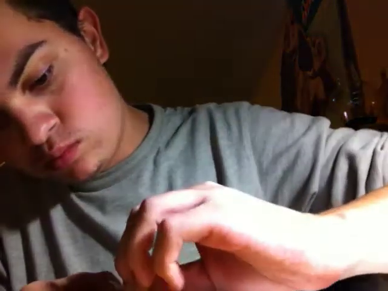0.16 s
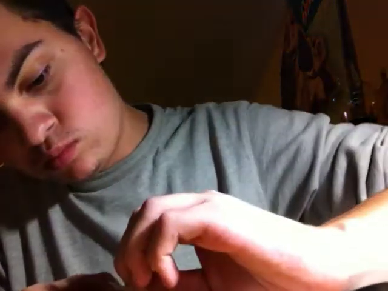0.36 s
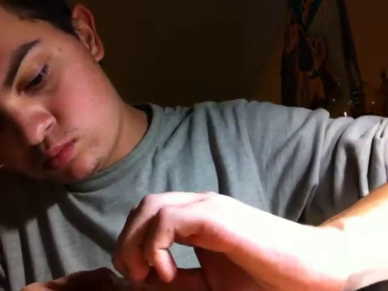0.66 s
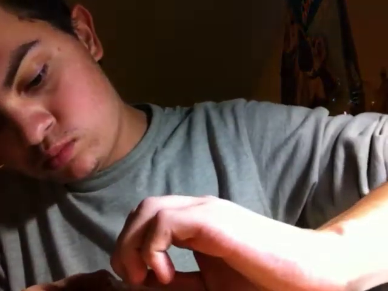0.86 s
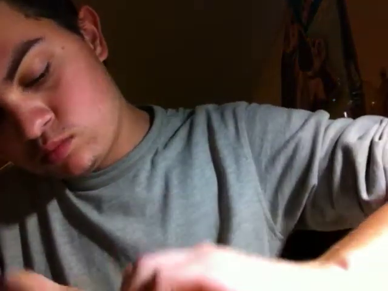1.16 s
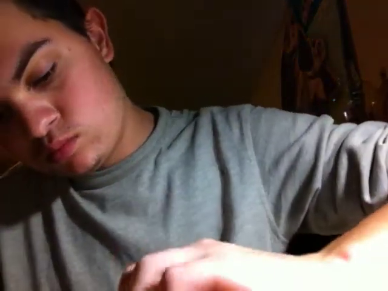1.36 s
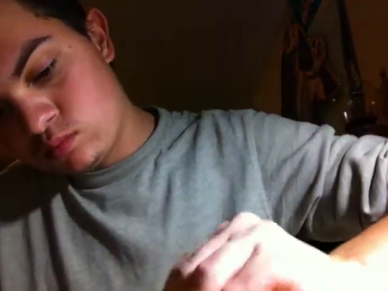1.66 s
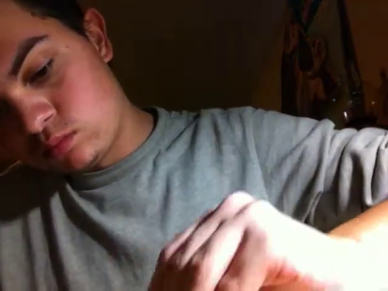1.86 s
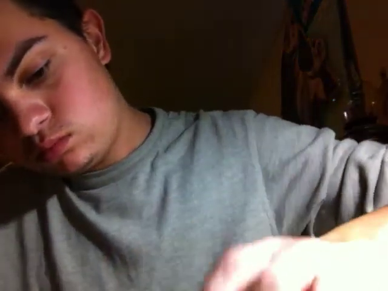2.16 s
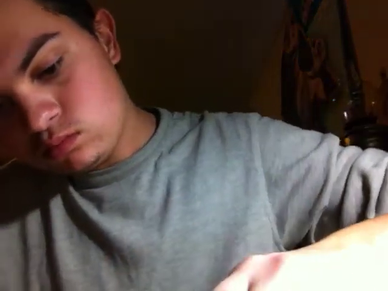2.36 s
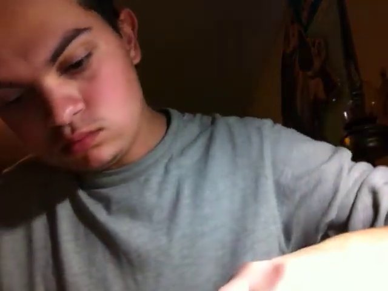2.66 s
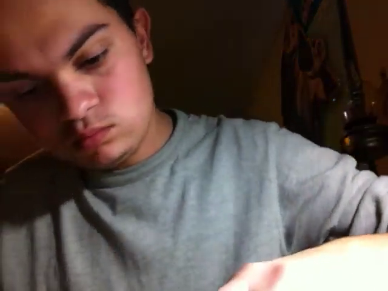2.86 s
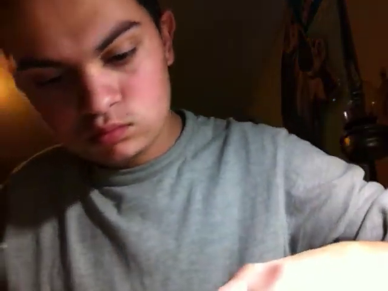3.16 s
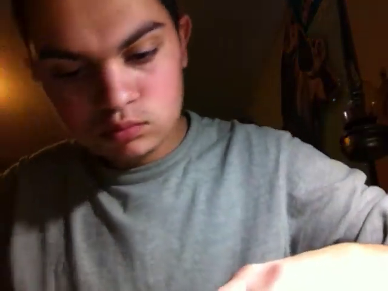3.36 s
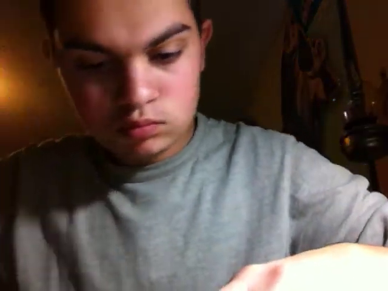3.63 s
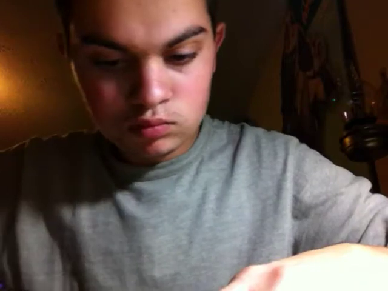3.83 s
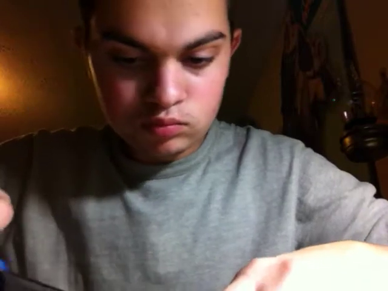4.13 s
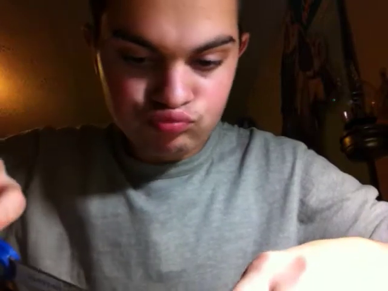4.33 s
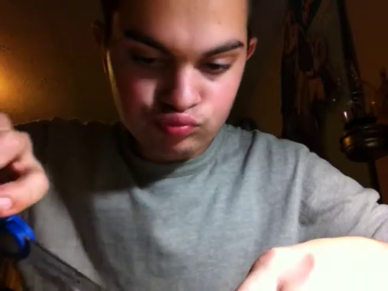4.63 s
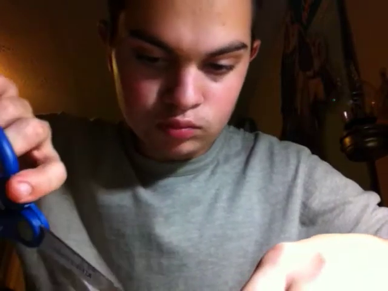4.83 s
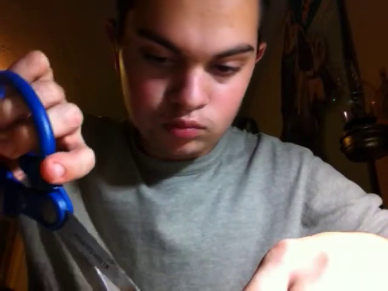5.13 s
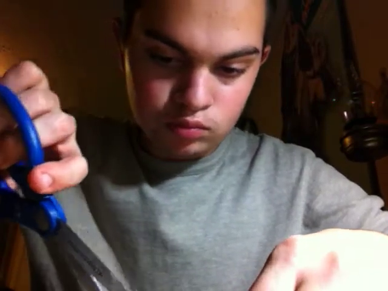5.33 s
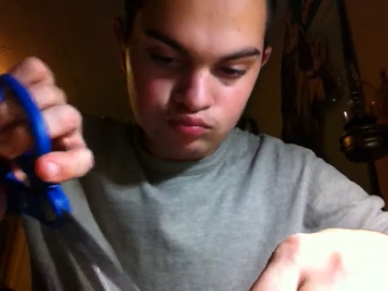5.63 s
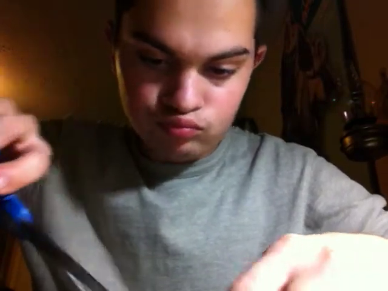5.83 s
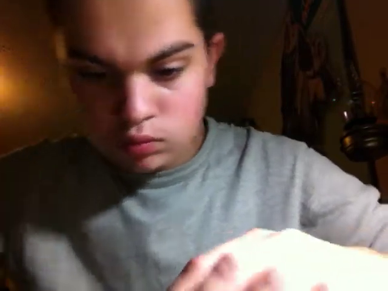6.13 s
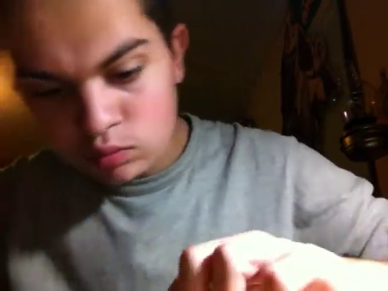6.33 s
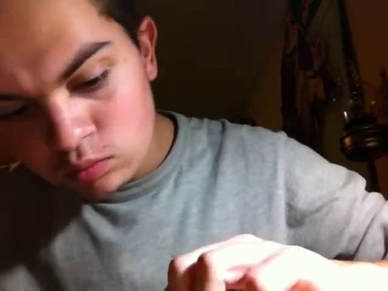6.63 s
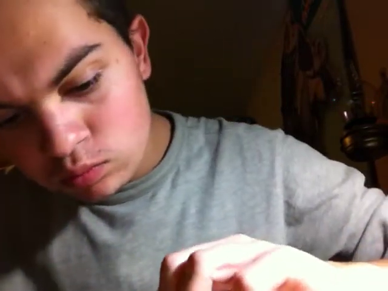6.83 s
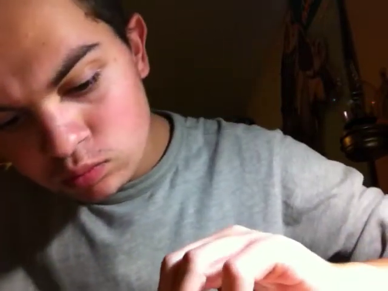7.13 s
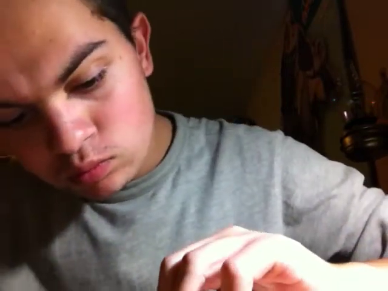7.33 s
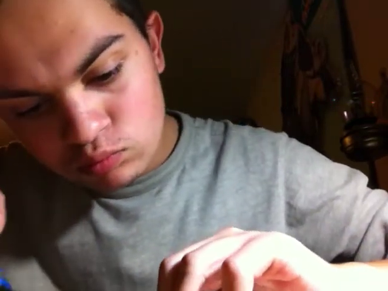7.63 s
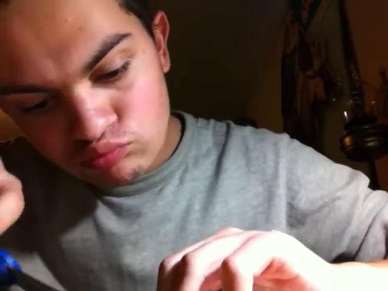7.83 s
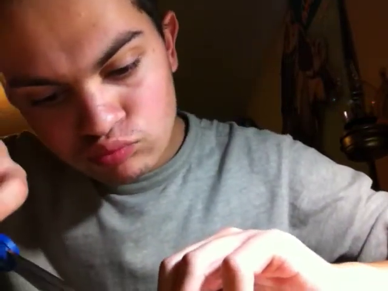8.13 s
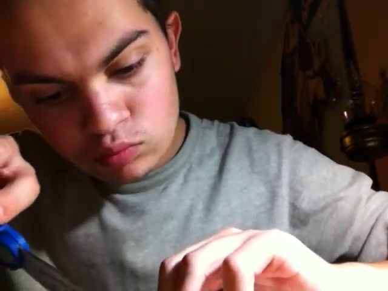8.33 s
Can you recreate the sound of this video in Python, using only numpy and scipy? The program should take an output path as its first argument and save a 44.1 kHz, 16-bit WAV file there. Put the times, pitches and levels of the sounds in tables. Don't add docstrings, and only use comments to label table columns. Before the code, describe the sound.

For the first second there is only a low, slightly wavering motor hum and soft microphone hiss in a small quiet room. From about 1.0 s plastic rustles; at 1.2 a hollow wooden knock lands with a short scrape and a few softer bumps. A sharp scissor snap cracks at 1.6, and the loudest, brightest snap at 1.73, with scraping and crinkling until about 2.1. Dull rubs follow from 2.25, then a rapid stick-slip creak around 2.5-2.6 and a resonant third snap at 2.74. From 2.9 to 5.6 it is mostly hum, with lone faint ticks near 3.45, 4.15, 4.4, 4.85 and 5.3. A weaker cut comes at 5.68 amid small clicks, then a soft rub at 6.07 and scattered snips. A last moderate cut snaps at 7.5, followed by faint ticks at 7.6-8.35 as the hiss sinks slightly.

```python
import sys
import numpy as np
from scipy import signal
from scipy.fft import rfft, irfft
from scipy.io import wavfile
from scipy.ndimage import uniform_filter1d

SR = 44100
rng = np.random.default_rng(int(sys.argv[2]) if len(sys.argv) > 2 else 0)


def volts_from_decibels(level):
    exponent = np.asarray(level, float) / 20
    return 10 ** exponent


def transcribe(signal):
    frames = np.atleast_2d(signal).T
    limited = np.clip(frames, -1, 1)
    pcm = np.round(limited * 32767).astype(np.int16)
    wavfile.write(sys.argv[1], SR, pcm)


N = 374409
PIECE = 4096
BINS_HZ = np.maximum(np.fft.rfftfreq(PIECE, 1 / SR), 100)

# start in seconds, peak in dB, bass limit in Hz, push into the table in dB,
# slope of the valleys in dB per octave.
CUTS = [
    (1.605, -11.5, 484, -21.5, -10),
    (1.73, -4, 850, -31, -4.5),
    (2.738, -15.5, 403, -16.5, -4.5),
    (5.679, -24.5, 600, -25, -1),
    (7.506, -20, 600, -29, -1),
]
# frequency in Hz, width in Hz, level in dB.
CUT_RESONANCES = [
    [(1100, 96, -8), (1720, 97, -2), (3280, 380, -14), (5140, 110, -23), (6240, 105, -33), (6850, 47, -33),
     (8530, 310, -32)],
    [(1720, 130, -1.5), (2970, 420, -5), (5220, 120, -4), (5650, 140, -21), (7160, 220, -12.5),
     (9640, 140, -15), (10200, 150, -20)],
    [(1100, 110, 9.5), (1870, 62, 8.5), (2970, 120, 6), (4100, 280, -2.5), (6360, 100, -25),
     (7660, 160, -18), (12000, 100, -33)],
    [(1100, 110, 3), (3150, 95, -4), (3740, 150, 3), (5050, 280, 6), (6240, 150, -4), (7850, 130, 0),
     (11700, 92, -19)],
    [(1700, 570, 3), (2840, 310, 3), (3600, 290, 5), (5360, 310, 1.5), (7120, 190, -10), (8720, 380, -8.5),
     (11600, 880, -16)],
]
CUT_HOLD_MS, CUT_RELEASE_MS = 2.2, 2.56
CUT_VALLEY_DB, CUT_WIDEN, CUT_TOP_HZ = -4.5, 2.34, 10300

# start in seconds, peak in dB, brightness in dB per octave,
# push into the table in dB.
SNIPS = [(1.331, -40, 1, 6), (1.537, -30.5, 16, -19), (1.866, -37.5, -5.5, -8), (1.881, -29, -10, -27),
         (2.232, -49.5, 5, 5), (2.492, -51, -6, 1), (2.878, -43, -7, -9), (2.889, -50, 3, 2),
         (3.45, -37, 15.5, -20), (4.157, -43.5, 10, -5), (4.391, -41.5, 0, -6), (4.85, -40, -0.5, -13),
         (5.312, -43, -1, -11), (5.639, -45, 2, -9), (5.739, -43, 3, -7), (5.759, -46, 1.5, -9),
         (6.138, -43, -3, -25), (6.353, -39, -6, -8), (6.698, -37.5, 0.3, -20), (6.926, -38, 0, -15),
         (6.966, -43.5, -3, -26), (7.61, -41.5, 0.5, -11), (7.757, -51.5, 1.2, 0), (7.88, -44, 2, -18),
         (7.943, -37.5, 0.5, -14), (8.225, -49, 0, 0), (8.336, -42.5, 4, -3.5)]
SNIP_MS, SNIP_NARROW_DB = 2.45, 2.5
# start in seconds, peak in dB,
# brightness in dB per octave, length in ms.
CONTACTS = [
    (1.209, -26.5, 0, 5.5),
    (1.223, -18, -1, 8.1),
    (1.227, -28.5, 1, 45),
    (1.601, -30, 5, 2.4),
    (1.613, -27.5, -3.5, 19),
    (1.716, -24.5, -0.8, 2.6),
    (1.742, -26, 5.5, 40),
    (5.675, -31, 3.5, 4.8),
    (5.689, -36, 4, 13),
    (7.514, -51, -7, 6.3),
]
CONTACT_NARROW_DB, CONTACT_PUSH_DB = 1.45, -19
# start in seconds, peak in dB, brightness in dB per octave,
# length in ms.
RUBS = [
    (2.26, -42.5, -6.5, 16),
    (2.38, -43, -1, 18),
    (2.53, -42.5, -6, 25),
    (6.066, -43, -2.5, 47),
    (7.485, -44.5, -4, 21),
]
RUB_NARROW_DB, RUB_PUSH_DB = 0.8, -3
# start in seconds, peak in dB, length in ms.
SLIPS = [
    (2.48, -42, 57),
    (2.561, -31, 2.7),
    (2.574, -30, 9.0),
    (2.588, -32.5, 8.8),
    (2.594, -35, 1.4),
    (2.601, -27.5, 3.1),
    (2.609, -44, 3.5),
]
SLIP_BRIGHT_DB, SLIP_NARROW_DB, SLIP_PUSH_DB = 4.5, 14.5, -21.5
# frequency in Hz, level in dB, t60 in seconds.
PACK = [(600, 2, 0.0034), (853, 0, 0.01), (1100, -2.5, 0.017), (1215, -2.5, 0.015), (1620, -2.5, 0.012),
        (1756, -8.5, 0.015), (2320, -1, 0.01), (2950, 3, 0.0055), (3340, -11, 0.024), (3880, 6.5, 0.0028),
        (4900, -21, 0.018), (4860, -3.5, 0.0034), (7500, -40, 0.0066)]
FILM_DB = 22.5

# start in seconds, level in dB, contact cutoff in Hz,
# lean to the upper modes in dB per octave.
KNOCKS = [(1.2259, -11, 890, -0.5), (1.2336, -25.5, 1200, 8.5), (1.244, -14, 600, 0.5),
          (1.253, -12, 600, -2), (1.263, -30, 600, -8.5), (1.30, -39, 500, 4), (1.345, -42, 500, -4),
          (1.402, -42, 600, 0), (1.6166, -26, 1100, 8), (1.625, -24.5, 800, -1.5), (1.74, -33, 500, -4)]
# frequency in Hz, level in dB, t60 in seconds.
TABLE = [(56, -10, 0.41), (111, -19, .12), (152.8, -8, 0.22), (184, -16, 0.06), (266, -9, 0.09),
         (274.5, -3.5, 0.2), (366.4, -3, 0.099), (457, -7, 0.081), (525, -6.5, 0.14), (634, -15.5, 0.12),
         (722, -11.5, 0.089), (773, -14.5, 0.058), (844, -14, 0.053), (1169, -10.5, 0.063),
         (1330, -14, 0.026), (1740, -17.5, 0.045)]
BASS_CUT_HZ = 164

# start in seconds, peak in dB, frequency in Hz,
# t60 in seconds.
PINGS = [(3.452, -42, 2900, .018), (3.45, -51, 5400, .02), (1.21, -33, 940, .03), (1.617, -18.5, 676, .04),
         (2.491, -38.5, 1270, 0.063), (2.59, -33.5, 766, 0.088), (4.158, -49, 1630, 0.025),
         (4.156, -50, 3700, .03), (4.394, -50, 1100, .03), (4.851, -49, 1160, 0.066),
         (5.317, -52, 1010, 0.047), (5.637, -47, 1680, .04), (5.638, -46, 900, .04),
         (5.759, -60, 1150, .05), (6.08, -54, 1450, .05), (6.927, -50, 2850, 0.033), (7.335, -49, 720, .03),
         (7.615, -45, 3660, .02), (7.944, -40, 600, 0.033), (8.226, -49, 1000, .03)]
PING_STRIKE_MS = 1.55

# time in seconds, effort in dB.
HANDLING = [
    [(1.0, -75), (1.146, -51.5), (1.272, -52), (1.554, -61), (1.646, -49), (1.77, -56), (1.934, -51),
     (2.03, -65), (2.15, -76)],
    [(2.17, -66), (2.282, -54), (2.422, -55.5), (2.594, -47.5), (2.704, -59), (2.854, -58), (3.0, -75)],
    [(5.6, -65), (6.25, -70)],
    [(7.46, -66), (8.45, -69)],
]
# frequency in Hz, level in dB per Hz.
RUSTLE = [(300, 8), (600, -1), (900, -1), (1400, -4.5), (2000, -21), (3000, -30)]
CRINKLE = [(1500, 6), (2500, 7.5), (5000, 5), (9000, 2.5), (15000, -5)]
CRINKLE_DB, CRINKLE_FOLLOWS = -61, 1.13
GRAINS_PER_S = 7000

# frequency in Hz, level in dB per Hz.
BUZZ_SPECTRUM = [(1500, 0), (4000, 1), (10000, 3), (15800, -3)]
BUZZ_DB = -24.5

# frequency in Hz, t60 in seconds.
ROOM_T60 = [(250, 0.63), (700, 0.19), (2000, 0.37), (5000, 0.12), (11000, 0.34)]
ROOM_DB, WALL_ECHO_MS, WALL_ECHO_DB = -18, 8.3, -22.5

# frequency in Hz, rms level in dB, width in Hz.
HUM = [(119.6, -69.5, 0.77), (126.7, -71.5, 5.2), (275, -56, 1.12), (355, -73, 1), (560, -101, 1.9),
       (15280, -91, .6)]
# frequency in Hz, level in dB per Hz.
AIR = [(12, -26), (25, -32), (55, -17.5), (95, -17.5), (125, -11), (160, -13.5), (250, -11), (350, -12.5),
       (450, -15), (825, -20), (1860, -24.5), (3000, -25), (8000, -25.5), (14000, -26), (15790, -28)]
AIR_DB, AIR_SINKS_FROM_S, AIR_SINK_DB_PER_S = -54.5, 7.66, 2

# start in seconds, end in seconds, lower edge in Hz.
TREBLE_DIPS = [
    (1.214, 1.2205, 9500),
    (1.7225, 1.7275, 3700),
    (2.7215, 2.736, 1100),
    (5.669, 5.673, 2000),
]
TOP_HZ = 15900


def snips():
    events = tear_events()
    noises = rng.standard_normal((len(events) + len(CUTS), PIECE))
    pieces = small_tears(events, noises) + loud_cuts(noises[::-1])
    sound, force = np.zeros(N), np.zeros(N)
    for s, peak_db, push_db, piece in pieces:
        add(sound, s, peak_at(peak_db, piece))
        add(force, s, volts_from_decibels(peak_db + push_db) * soft_push(1640))
    return sound, force


def loud_cuts(noises):
    pieces = []
    for (s, peak_db, bass_hz, push_db, fall_db), resonances, noise in zip(CUTS, CUT_RESONANCES, noises):
        colour_db = cut_colour(resonances, fall_db, bass_hz)
        pieces.append((s, peak_db, push_db, causal(bite(noise), colour_db)))
    return pieces


def bite(noise):
    ms = np.arange(PIECE) / SR * 1000
    clicks = noise * np.abs(noise) * np.exp(-np.maximum(ms - CUT_HOLD_MS, 0) / CUT_RELEASE_MS)
    clicks[0] = 2.5
    return whitened(clicks, 25)


def cut_colour(resonances, fall_db, bass_hz):
    valley_db = CUT_VALLEY_DB + fall_db * np.log2(np.maximum(BINS_HZ / 1000, 1))
    power = volts_from_decibels(2 * valley_db) / (1 + (BINS_HZ / CUT_TOP_HZ) ** 12.0)
    for hz, width_hz, db in resonances:
        detune = 2 * (BINS_HZ - hz) / (CUT_WIDEN * width_hz)
        power = power + volts_from_decibels(2 * db) / (1 + detune ** 2) ** 2
    return 10 * np.log10(power / (1 + (bass_hz / BINS_HZ) ** 7.7))


def small_tears(events, noises):
    octaves = np.log2(BINS_HZ / 1000)
    chances = rng.standard_normal((len(events), len(PACK)))
    pieces = []
    for (s, peak_db, bright_db, narrow_db, ms, push_db), noise, chance in zip(events, noises, chances):
        rip = tear(noise, ms)
        crack = pack_modes(rip, chance) + volts_from_decibels(FILM_DB) * rip
        colour_db = np.maximum(bright_db * octaves - narrow_db * octaves ** 2, -50)
        pieces.append((s, peak_db, push_db, causal(crack, colour_db)))
    return pieces


def tear_events():
    rows = [(s, db, bright, SNIP_NARROW_DB, SNIP_MS, push) for s, db, bright, push in SNIPS]
    rows += [(s, db, bright, CONTACT_NARROW_DB, ms, CONTACT_PUSH_DB) for s, db, bright, ms in CONTACTS]
    rows += [(s, db, bright, RUB_NARROW_DB, ms, RUB_PUSH_DB) for s, db, bright, ms in RUBS]
    rows += [(s, db, SLIP_BRIGHT_DB, SLIP_NARROW_DB, ms, SLIP_PUSH_DB) for s, db, ms in SLIPS]
    return sorted(rows)


def tear(noise, ms):
    clicks = noise * np.abs(noise) * np.exp(-np.arange(PIECE) / SR * 1000 / ms)
    clicks[:int(ms * SR / 1000)] *= 1.3
    clicks[0] = 1.5
    return whitened(clicks, 19)


def pack_modes(rip, chance):
    out = np.zeros(PIECE)
    for k, (hz, db, t60) in enumerate(PACK):
        out += (-1) ** k * volts_from_decibels(db + 2.4 * chance[k]) * ring(rip, hz, t60)
    return out


def table(snip_force):
    out = np.zeros(N)
    for hz, mode_db, t60 in TABLE:
        force = snip_force.copy()
        for s, db, cut_hz, lean_db in KNOCKS:
            add(force, s, volts_from_decibels(db + lean_db * np.log2(hz / 270)) * soft_push(cut_hz))
        out -= volts_from_decibels(mode_db) * ring(force, hz, t60)
    return signal.sosfilt(signal.butter(2, BASS_CUT_HZ, "high", fs=SR, output="sos"), out)


def pings():
    out = np.zeros(N)
    fade = np.exp(-np.arange(PIECE) / SR * 1000 / PING_STRIKE_MS)
    for s, peak_db, hz, t60 in PINGS:
        add(out, s, peak_at(peak_db, ring(rng.standard_normal(PIECE) * fade, hz, t60)))
    return out


def handling():
    t, out = np.arange(N) / SR, np.zeros(N)
    dull, bright = grains()
    rustle = coloured(dull, RUSTLE) * volts_from_decibels(2.5 * drift(25))
    crinkle = coloured(bright, CRINKLE) * volts_from_decibels(2.2 * drift(18))
    for rows in HANDLING:
        s, effort_db = np.transpose(rows)
        crinkle_db = CRINKLE_DB + CRINKLE_FOLLOWS * (effort_db + 55)
        out += rustle * volts_from_decibels(np.interp(t, s, effort_db, left=-120, right=-120))
        out += crinkle * volts_from_decibels(np.interp(t, s, crinkle_db, left=-120, right=-120))
    return out


def grains():
    clicks = rng.standard_normal((2, N))
    strength = volts_from_decibels(2.4 * np.minimum(rng.exponential(1, (2, N)), 5))
    return clicks * strength * (rng.random((2, N)) < GRAINS_PER_S / SR)


def buzz(wood):
    shake = uniform_filter1d(np.abs(wood), 60)
    level = volts_from_decibels(BUZZ_DB) * shake * (shake / 0.18) ** 0.069
    return level * coloured(rng.standard_normal(N), BUZZ_SPECTRUM)


def room(x):
    t = np.arange(SR // 2) / SR
    tail = np.zeros(len(t))
    for hz, t60 in ROOM_T60:
        sos = signal.butter(1, [hz / 3.6, hz * 0.67], "band", fs=SR, output="sos")
        tail += signal.sosfilt(sos, rng.standard_normal(len(t))) * volts_from_decibels(-60 * t / t60)
    tail *= 1 - np.exp(-(t / 0.01) ** 2)
    tail = volts_from_decibels(ROOM_DB) * tail / np.sqrt(np.sum(tail ** 2))
    add(tail, WALL_ECHO_MS / 1000, volts_from_decibels(WALL_ECHO_DB) * np.array([.5, 1, .5]))
    return signal.fftconvolve(x, tail)[:N]


def hum():
    t, out = np.arange(N) / SR, np.zeros(N)
    for hz, db, width_hz in HUM:
        level = np.sqrt(2) * volts_from_decibels(db + 1.9 * drift(width_hz))
        out += level * np.sin(2 * np.pi * hz * t + 1.94 * drift(width_hz))
    return out


def air():
    sink_db = AIR_SINK_DB_PER_S * np.maximum(np.arange(N) / SR - AIR_SINKS_FROM_S, 0)
    return volts_from_decibels(AIR_DB - sink_db) * coloured(rng.standard_normal(N), AIR)


def ring(force, hz, t60):
    r, w = volts_from_decibels(-60 / (t60 * SR)), 2 * np.pi * hz / SR
    return signal.lfilter([0, np.sin(w)], [1, -2 * r * np.cos(w), r * r], force + 1e-18)


def soft_push(cut_hz):
    t = np.arange(600) / SR
    push = t * np.exp(-2 * np.pi * cut_hz * t)
    return push / push.sum()


def causal(x, colour_db):
    cepstrum = irfft(np.log(10) / 20 * colour_db)
    cepstrum[1:PIECE // 2] *= 2
    cepstrum[PIECE // 2 + 1:] = 0
    return irfft(rfft(x) * np.exp(rfft(cepstrum)))


def whitened(clicks, bins):
    power = uniform_filter1d(np.abs(rfft(clicks)) ** 2, size=bins)
    return causal(clicks, -10 * np.log10(power + 1e-6))


def coloured(x, spectrum):
    hz, level_db = np.transpose(spectrum)
    f = np.maximum(np.fft.rfftfreq(N, 1 / SR), 1)
    gain = volts_from_decibels(np.interp(np.log(f), np.log(hz), level_db, left=-60, right=-60))
    return rms_one(irfft(rfft(x) * gain, N))


def drift(rate_hz):
    r = np.exp(-80 * np.pi * rate_hz / SR)
    slow = signal.lfilter([1], [1, -2 * r, r * r], rng.standard_normal(N // 40 + 2002))[2000:]
    return np.interp(np.arange(N) / 40, np.arange(len(slow)), rms_one(slow))


def rms_one(x):
    return x / np.sqrt(np.mean(x ** 2) + 1e-20)


def peak_at(peak_db, piece):
    return volts_from_decibels(peak_db) * piece / np.abs(piece).max()


def add(track, s, piece):
    i = round(s * SR)
    track[i:i + len(piece)] += piece[:N - i]


def scene():
    sound, force = snips()
    wood = table(force)
    close = sound + wood + buzz(wood) + handling()
    tail = room(sound + volts_from_decibels(-1.5) * wood)
    floor = hum() + air()
    return (close + tail + floor + pings())[None]


def low_pass(x):
    return signal.sosfilt(signal.butter(12, 15830, fs=SR, output="sos"), x)


def record(dry):
    t, out = np.arange(N) / SR, dry.copy()
    for start_s, end_s, hz in TREBLE_DIPS:
        highs = signal.sosfiltfilt(signal.butter(4, hz, "high", fs=SR, output="sos"), dry)
        out -= .95 * highs * np.clip(np.minimum(t - start_s, end_s - t) / .001, 0, 1)
    out = signal.sosfilt(signal.cheby2(14, 40, TOP_HZ * 1.03, fs=SR, output="sos"), out)
    return low_pass(out)


dry = scene()
out = record(dry)
transcribe(out)
```